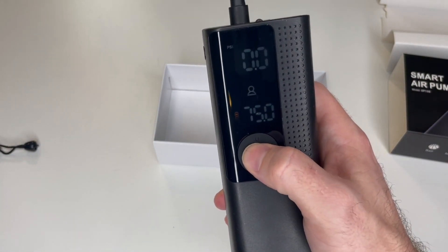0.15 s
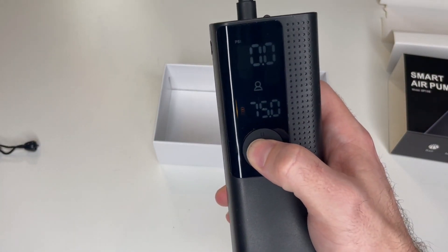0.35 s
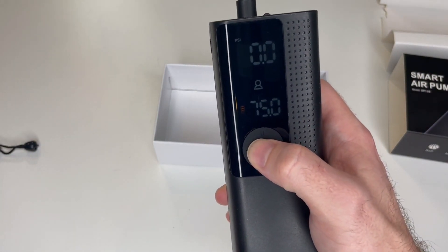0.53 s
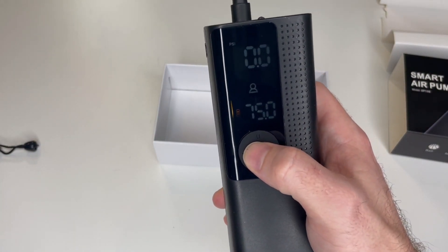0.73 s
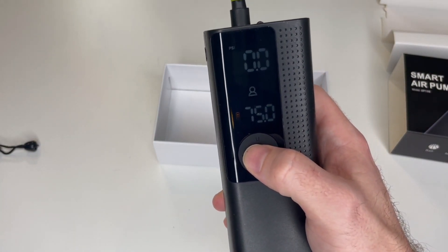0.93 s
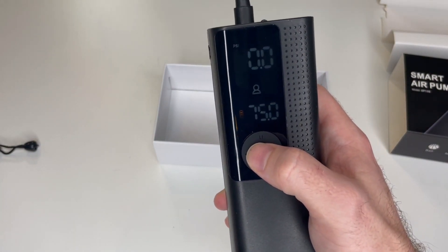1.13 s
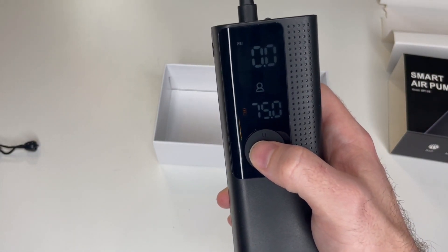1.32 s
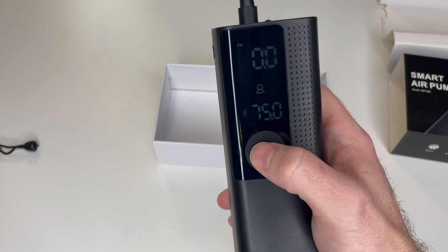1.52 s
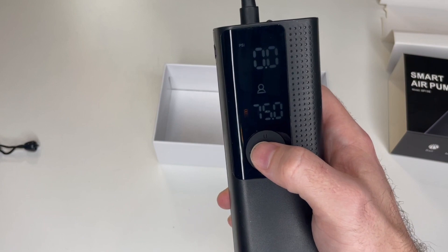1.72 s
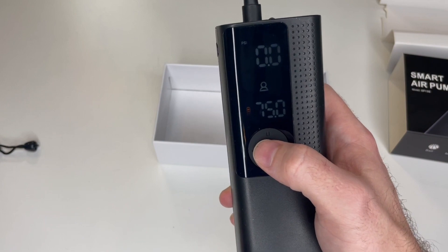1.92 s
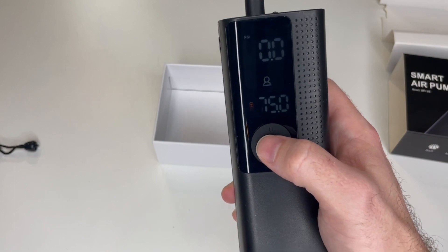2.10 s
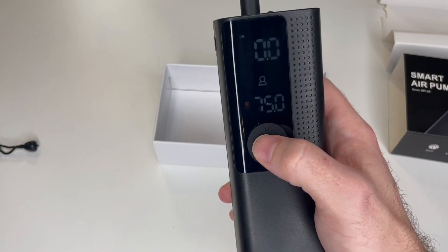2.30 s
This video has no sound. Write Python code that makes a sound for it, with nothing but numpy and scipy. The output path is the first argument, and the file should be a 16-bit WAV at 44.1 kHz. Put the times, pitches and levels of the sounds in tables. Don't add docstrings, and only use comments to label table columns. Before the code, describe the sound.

After a third of a second of faint room hum, a button click and sharp knocks start a small electric compressor, which buzzes and whines steadily, close-miked indoors with a slight short room sound.

```python
import sys
import numpy as np
from scipy import signal
from scipy.fft import rfft, irfft
from scipy.io import wavfile

SR = 44100
rng = np.random.default_rng(int(sys.argv[2]) if len(sys.argv) > 2 else 0)


def generate_wav(signal):
    frames = np.transpose(np.atleast_2d(signal))
    scaled = np.clip(frames, -1, 1) * 32767
    pcm = np.round(scaled).astype(np.int16)
    wavfile.write(sys.argv[1], SR, pcm)


def boost_factor(decibels):
    exponent = np.asarray(decibels, float) / 20
    return 10 ** exponent


N = 103635

# f/Hz, level/dB (per Hz)
ROOM_TONE = [(15, -53), (25, -22), (65, -12), (91, -27), (124, -6.5), (152, -25), (349, -24), (513, -32.5),
             (12000, -78), (15600, -113), (22000, -120)]
# f/Hz, width/Hz, level/dB
FAN_HUM = [(59.3, 28, -52.5), (121, 6.9, -57), (209.2, 24, -60.5), (260.6, 9.1, -60.5), (347, 14, -68)]
# t/s, level/dB (peak), f/Hz (ring), t60/s
KNOCKS = [(.3212, -43, 850, .008), (.3218, -44, 1800, .008), (.3215, -50, 2900, .006),
          (.338, -41, 2900, .01), (.3455, -17, 2900, .01), (.346, -27, 1000, .012), (.3645, -4, 1500, .02),
          (.364, -14, 3050, .02), (.356, -13, 2200, .03), (.392, -10, 2100, .03), (.391, -16, 1000, .03),
          (.415, -11, 2900, .015), (.337, -52, 5000, .008)]
# t/s, f/Hz
WHINE = [(.55, 2722), (.8, 2740), (1.05, 2748), (1.5, 2756), (2.0, 2766), (2.35, 2771)]
# t/s, level/dB
GAIN_RIDE = [(0.36, -15.5), (0.508, -18.5), (0.942, -19.5), (0.946, -21), (1.302, -22), (2.3, -22),
             (2.35, -23)]
# order/motor turn, level/dB, depths/1 of first, second, third crank sidebands
MESH = [
    (11, -12, .5, .45, .2),
    (12, -8, .35, .2, .12),
    (13, -18, .3, .3, .2),
]
# f/Hz, level/dB (per Hz)
CASE = [(300, -35), (700, -21.5), (1500, -17), (2300, -13.5), (3500, -20), (5000, -24.5), (8000, -28),
        (15500, -33)]
# f/Hz, width/Hz, lift/dB
CASE_PEAKS = [(2150, 250, 3), (2760, 700, 6), (2740, 200, 4), (3150, 300, 3), (12500, 1500, 3),
              (3960, 260, 5), (4600, 250, 4), (5620, 450, 8), (6340, 260, 10), (6060, 220, -9),
              (6650, 300, -5)]
# multiple of stroke rate/1, level/dB
PUFF = [(1, -38), (2, -7), (3, 0.5), (4, 0.5), (5, -3.5), (6, 0), (7, -6.5), (8, -7), (9, -7.5),
        (10, -32.5), (11, -13.5), (12, -6), (13, -8.5), (14, -2.5), (15, -9.5), (16, -6), (17, -2.5),
        (18, -21), (19, 1)]
# crank angle/turns, level/dB, f/Hz (ring), t60/s
VALVES = [
    (0.312, -4.5, 886, 0.014),
    (.63, -7, 916, 0.0058),
    (0.92, -6, 2100, 0.0068),
    (0.3, -7.5, 1490, 0.0041),
]
# t/s, extra level/dB
BIG_SPURTS = [
    (1.02, 4),
    (1.378, 5),
    (2.203, 3),
    (2.243, 6),
]
# f/Hz, phase/rad
PORT_LEAD = [(2000, .05), (2700, .55), (4100, .35), (4900, 2.9), (5300, 6.3), (6300, 6.5), (8800, 9.3),
             (11700, 9.5), (14300, 12.5)]
# f/Hz, level/dB
PORT_BALANCE = [(300, .1), (700, -.9), (1400, -.1), (2700, -1.4), (5000, -.2), (7000, 0)]
# f/Hz, level/dB
OPPOSITE_SHARE = [(100, -40.5), (450, -9), (900, -10.5), (1600, -27), (2700, -11.5), (4500, -13),
                  (5800, -9), (12000, -11.5), (15200, -39)]
# f/Hz, level/dB
COMMON_SHARE = [(200, -46), (3500, -13.5), (4900, -2), (6500, -16), (8600, -8.5), (10300, -30.5),
                (12000, -5), (15000, -15)]

PINION_TEETH, GEAR_TEETH, WHINE_ORDER = 11, 50, 12
START_S, RUN_UP_S, RUN_UP_LOSS, CRANK_START_TURNS = .347, .045, .4, .63
FADE_IN_S, WHINE_BUILD_S = 0.0084, .07
SETTLE_DB_PER_S = 2
ROOM_DB, ROOM_DUCK_DB, ROOM_SIDE_DB = -51, -10, -19
MESH_WOBBLE_DB, MESH_JITTER_RAD = 1.2, .15
SHELL_HZ, SHELL_WIDTH_HZ = 2760, 700
RATTLE_PER_S, RATTLE_SPREAD_DB, RATTLE_DB, RATTLE_HISS = 6000, 2.9, -1.5, 0.91
WORN_TEETH = .4
MOTOR_THROB_DB, STROKE_THROB_DB, TRIPLE_THROB_DB, SWELL_DB = 1.5, 2, 0.5, .5
THROB_ANGLE_TURNS = 0.19
PUFF_DB, PUFF_ANGLE_TURNS, PUFF_SMEAR_RAD = -26, 0.197, 6.13
SLAP_SCATTER_DB, SLAP_JITTER_S, SLAP_DETUNE = 2.5, .0002, .05
SPURT_DB, SPURT_SCATTER_DB, SPURT_HZ = -0.5, 3.0, 8000
SPURT_ANGLE_TURNS, SPURT_DECAY_TURNS = .3, 0.089
LOW_CUT_HZ, HIGH_CUT_HZ = 45, 16300

TIME = np.arange(N) / SR
SINCE_START = np.maximum(TIME - START_S, 0)


def rms_one(x):
    return x / np.sqrt(np.mean(x ** 2) + 1e-20)


def in_time(rows):
    return np.interp(TIME, *np.transpose(rows))


def at_hz(points, size=N):
    hz, value = np.transpose(points)
    return np.interp(np.log(np.fft.rfftfreq(size, 1 / SR) + 1), np.log(hz), value)


def drift(rate_hz):
    r = np.exp(-2 * np.pi * rate_hz / SR)
    slow = signal.lfilter([1], [1, -2 * r, r * r], rng.standard_normal(N + SR))
    return rms_one(slow[SR:])


def peak(x, hz, width_hz):
    r = np.exp(-np.pi * width_hz / SR)
    gain = (1 - r * r) / 2
    return signal.lfilter([gain, 0, -gain], [1, -2 * r * np.cos(2 * np.pi * hz / SR), r * r], x)


def settling_db():
    return SETTLE_DB_PER_S * (1.75 - TIME)


def room(running):
    noise = rfft(rng.standard_normal((2, N)))
    mid, side = rms_one(irfft(noise * boost_factor(at_hz(ROOM_TONE)), N)) * boost_factor(ROOM_DB - 3)
    for hz, width_hz, db in FAN_HUM:
        hum = peak(peak(rng.standard_normal(N), hz, width_hz), hz, width_hz)
        mid = mid + boost_factor(db) * rms_one(hum)
    return (mid + boost_factor(ROOM_SIDE_DB) * side * [[1], [-1]]) * boost_factor(ROOM_DUCK_DB * running)


def knock(out, s, db, hz, t60):
    i = int(s * SR)
    t = np.arange(min(int(t60 * SR), N - i)) / SR
    envelope = boost_factor(db - 60 * t / t60) * (1 - np.exp(-t * 10 / t60))
    out[i:i + len(t)] += 2 * envelope * np.sin(2 * np.pi * hz * t)


def crank():
    run_up = 1 - RUN_UP_LOSS * np.exp(-SINCE_START / RUN_UP_S)
    strokes_per_s = in_time(WHINE) / WHINE_ORDER * PINION_TEETH / GEAR_TEETH * run_up
    return CRANK_START_TURNS + np.cumsum(strokes_per_s * (SINCE_START > 0)) / SR


def valves(turns):
    slaps = np.zeros(N)
    luck = rng.standard_normal((200, 5, 3))
    for stroke in range(int(turns[-1])):
        for (angle, db, hz, t60), (late, loud, tune) in zip(VALVES, luck[stroke]):
            if stroke + angle > turns[0]:
                s = np.searchsorted(turns, stroke + angle) / SR + SLAP_JITTER_S * late
                slap_db = db + SLAP_SCATTER_DB * loud + SETTLE_DB_PER_S * (1.75 - s)
                knock(slaps, s, slap_db, hz * (1 + SLAP_DETUNE * tune), t60)
    since = turns - SPURT_ANGLE_TURNS + 1
    spurt_db = SPURT_DB + SPURT_SCATTER_DB * np.clip(luck[:, -1, 0], -2, 1)
    for s, db in BIG_SPURTS:
        spurt_db[round(since[int(s * SR)])] = SPURT_DB + db
    spurt = boost_factor(spurt_db[since.astype(int)]) * np.exp(-(since % 1) / SPURT_DECAY_TURNS)
    high_pass = signal.butter(2, SPURT_HZ, "high", fs=SR, output="sos")
    air = signal.sosfilt(high_pass, rng.standard_normal(N))
    return slaps + spurt * rms_one(air)


def rattle(turns):
    sizes = boost_factor(RATTLE_SPREAD_DB * np.minimum(rng.exponential(1, N), 5)) * rng.choice([-1, 1], N)
    contacts = rms_one(sizes * (rng.random(N) < RATTLE_PER_S / SR))
    hiss = RATTLE_HISS * rng.standard_normal(N)
    tooth = (turns * GEAR_TEETH).astype(int)
    wear = rng.standard_normal(GEAR_TEETH)[tooth % GEAR_TEETH] * np.diff(tooth, prepend=tooth[0])
    grains = contacts + hiss + WORN_TEETH * rms_one(wear)
    angle = 2 * np.pi * (turns - THROB_ANGLE_TURNS)
    throb = MOTOR_THROB_DB * np.cos(2 * np.pi * turns * GEAR_TEETH / PINION_TEETH)
    throb = throb + STROKE_THROB_DB * np.cos(angle) + TRIPLE_THROB_DB * np.cos(3 * angle)
    grains = grains * boost_factor(throb + SWELL_DB * drift(4.2))
    x = irfft(rfft(grains) * boost_factor(at_hz(CASE)), N)
    for hz, width_hz, db in CASE_PEAKS:
        x = x + (boost_factor(db) - 1) * peak(x, hz, width_hz)
    return boost_factor(RATTLE_DB) * rms_one(x)


def piston(turns):
    puff = 0
    for k, db in PUFF:
        phase = 2 * np.pi * k * (turns - PUFF_ANGLE_TURNS) - PUFF_SMEAR_RAD * np.log(k)
        puff = puff + boost_factor(db + settling_db() * (k > 6)) * np.cos(phase)
    return boost_factor(PUFF_DB) * np.sqrt(2) * puff


def gears(turns):
    whine = 0
    for order, db, *depths in MESH:
        sway = 1
        for k, depth in enumerate(depths, 1):
            sway = sway + 2 * depth * np.cos(2 * np.pi * (k * turns + rng.random()))
        phase = 2 * np.pi * order * turns * GEAR_TEETH / PINION_TEETH + MESH_JITTER_RAD * drift(5)
        level = boost_factor(db + MESH_WOBBLE_DB * drift(18))
        whine = whine + level * sway * np.sqrt(2) * np.sin(phase)
    whine = whine * (1 - np.exp(-(SINCE_START / WHINE_BUILD_S) ** 2))
    return peak(whine, SHELL_HZ, SHELL_WIDTH_HZ) * boost_factor(0.81 * settling_db())


def ports(x, size=N + SR):
    tail = rng.standard_normal((2, N)) * boost_factor(-60 * TIME / 0.16)
    tail = rfft(tail / np.sqrt(np.sum(tail[0] ** 2)), size)
    direct = rfft(x, size)
    turn = boost_factor(at_hz(PORT_BALANCE, size) / 2) * np.exp(.5j * at_hz(PORT_LEAD, size))
    shares = boost_factor([at_hz(OPPOSITE_SHARE, size), at_hz(COMMON_SHARE, size)])
    opposite, common = direct * tail * shares
    left = direct * turn + common + opposite
    right = direct / turn + common - opposite
    return irfft([left, right], size)[:, :N]


def scene():
    turns = crank()
    running = np.clip((TIME - START_S) / FADE_IN_S, 0, 1)
    pump = valves(turns) + rattle(turns) + piston(turns) + gears(turns)
    pump = pump * boost_factor(in_time(GAIN_RIDE)) * running ** 2
    for row in KNOCKS:
        knock(pump, *row)
    return ports(pump) + room(running)


def band_limit(x):
    return signal.sosfilt(signal.butter(12, 16380, fs=SR, output="sos"), x)


def record(dry):
    low_cut = signal.butter(2, LOW_CUT_HZ, "high", fs=SR, output="sos")
    high_cut = signal.cheby2(12, 60, HIGH_CUT_HZ, fs=SR, output="sos")
    mix = signal.sosfilt(np.vstack([low_cut, high_cut]), dry)
    return band_limit(mix)


dry = scene()
out = record(dry)
generate_wav(out)
```